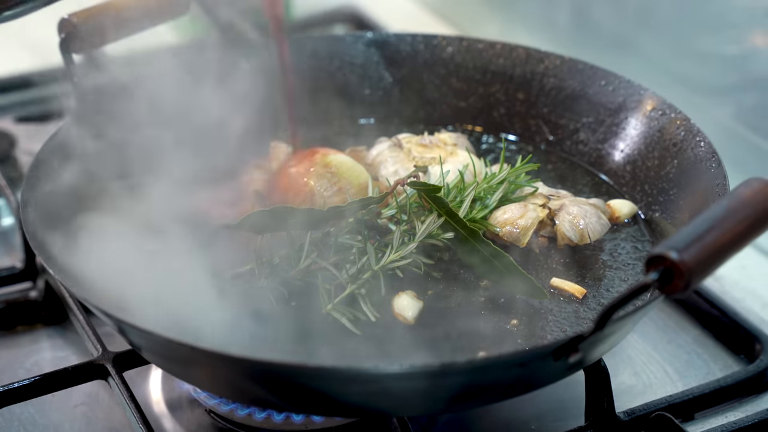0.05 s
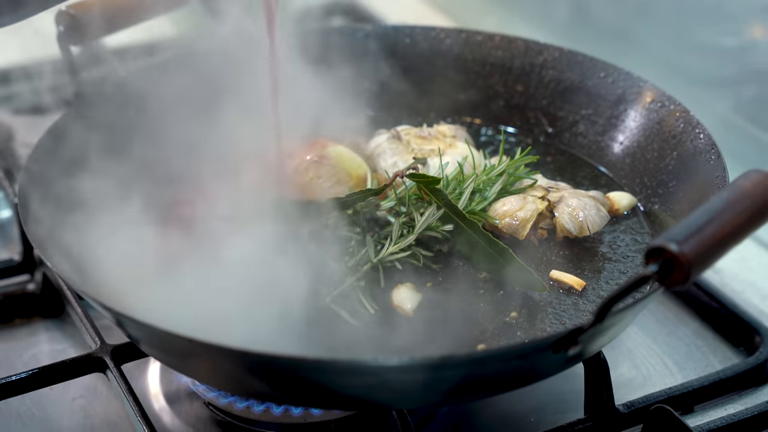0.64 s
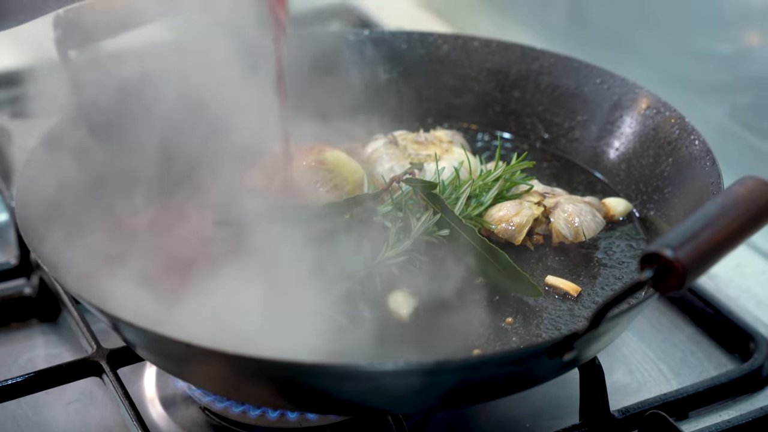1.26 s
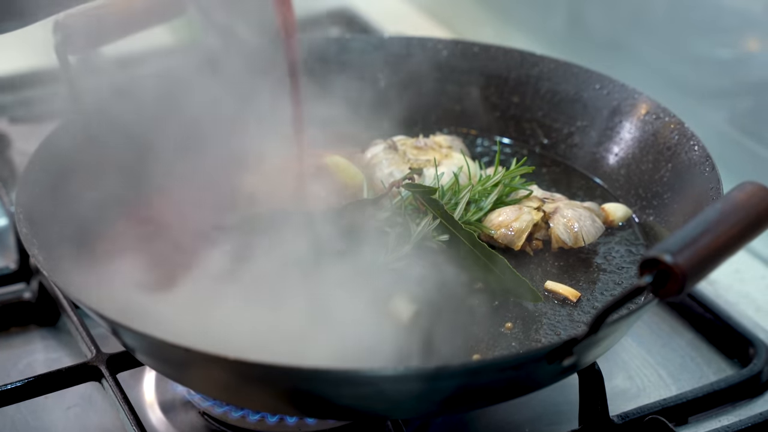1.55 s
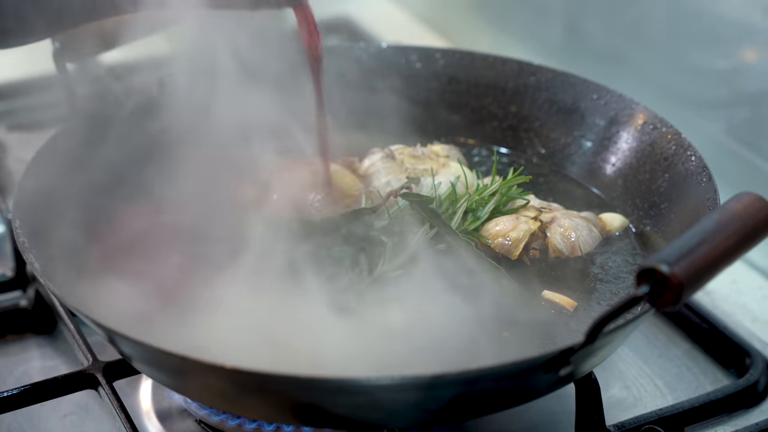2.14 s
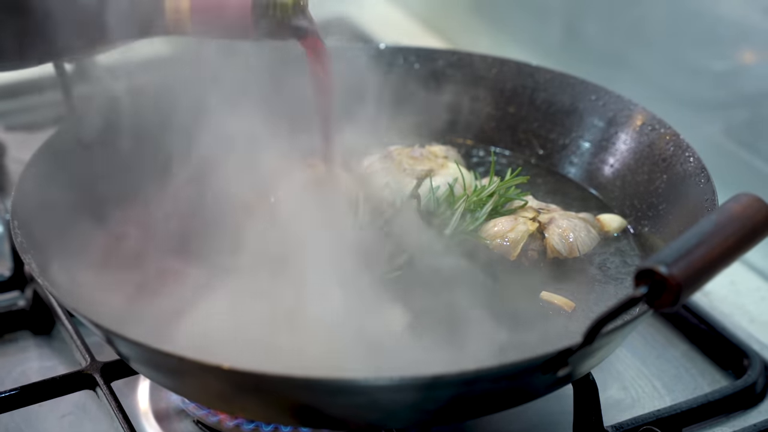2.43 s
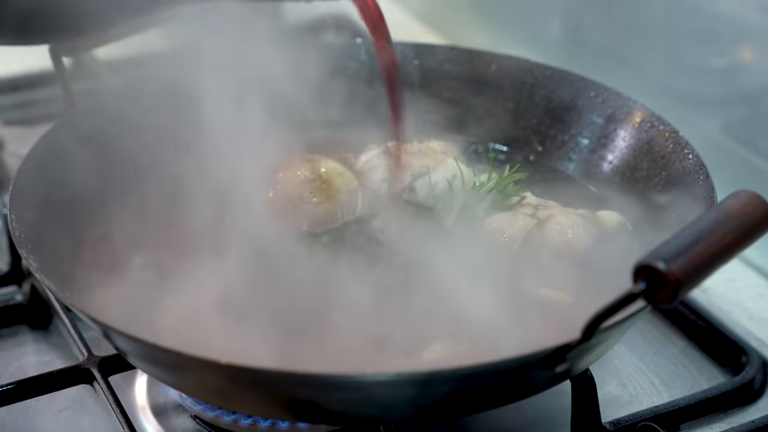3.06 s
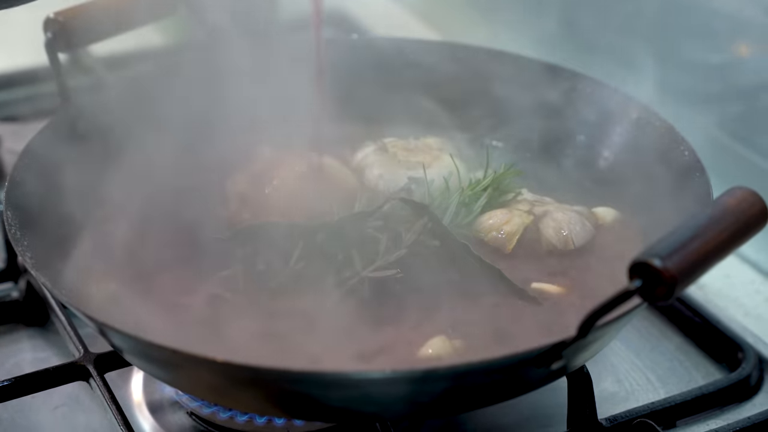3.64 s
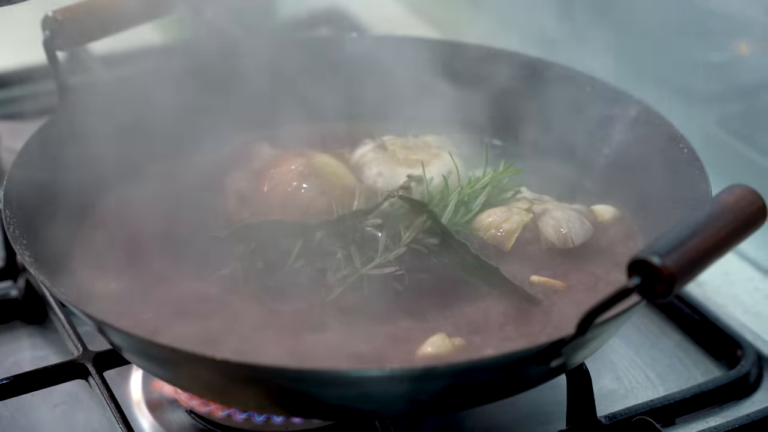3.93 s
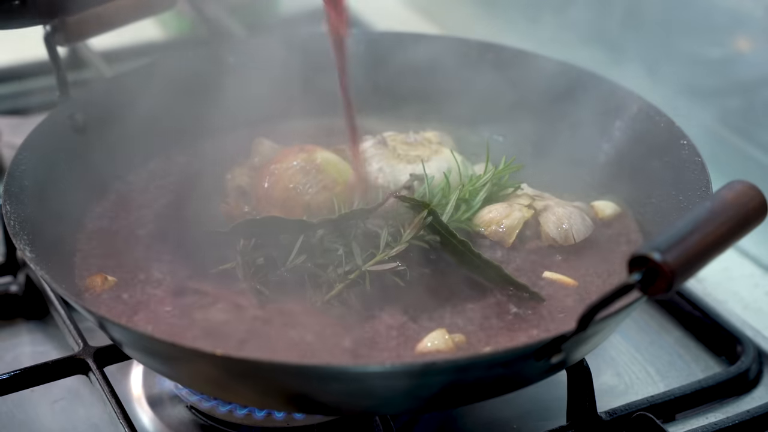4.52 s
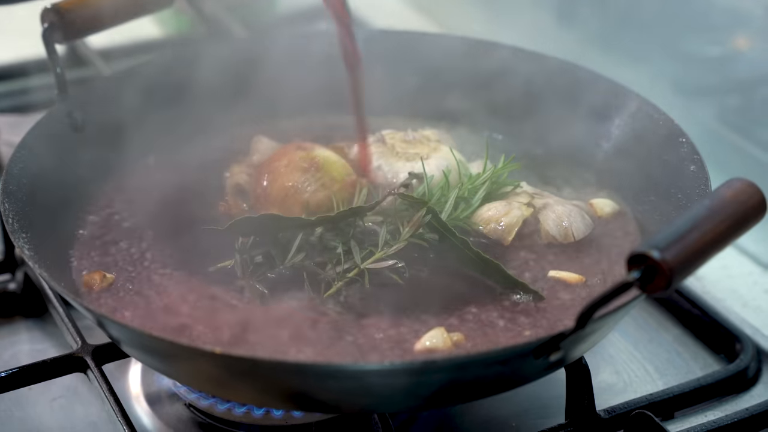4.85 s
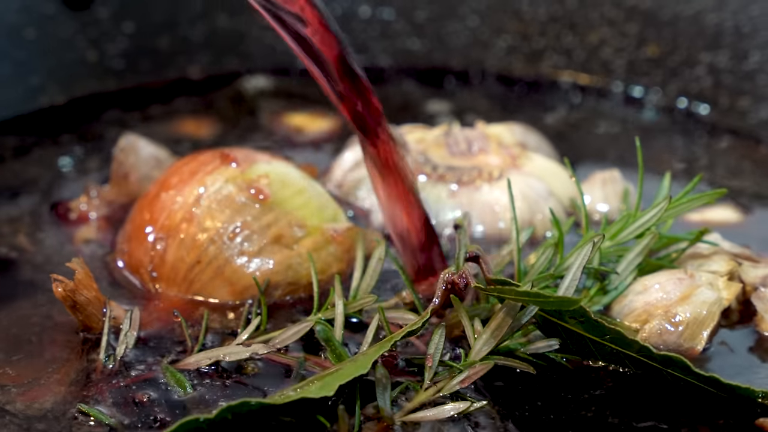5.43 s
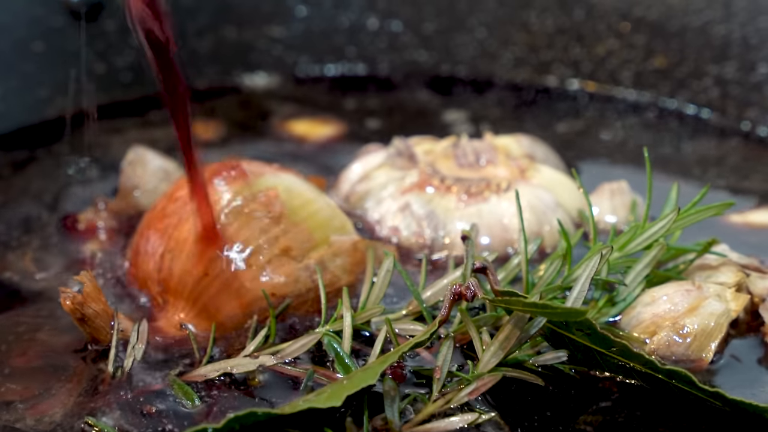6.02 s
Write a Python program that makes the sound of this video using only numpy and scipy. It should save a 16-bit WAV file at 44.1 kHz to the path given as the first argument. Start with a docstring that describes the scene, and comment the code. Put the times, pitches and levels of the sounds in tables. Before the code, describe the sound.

Wine poured into a very hot steel wok makes a dense, bright sizzle, heard close up at a kitchen gas stove. Fine bubbling seethes beneath it and grows. Both swell around the middle, then the fizz sinks and turns duller, leaving the bubbling more prominent as everything eases off. Far behind are a faint, fading steam whistle and a soft low rumble of flame and churning liquid.

```python
"""A dense bright fizz, close by: wine poured into a very hot steel wok on a gas ring.
Droplets flash to steam while bubbles seethe in the pool; the bowl colours both.
As the wine floods and cools the steel, the fizz sinks and dulls and the bubbling takes over.
Behind them, a faint fading steam whistle and the soft rumble of flame and churning liquid."""
import sys
import numpy as np
from scipy import signal
from scipy.io import wavfile

SR = 44100
rng = np.random.default_rng(int(sys.argv[2]) if len(sys.argv) > 2 else 0)


def wav_out(sig):
    """Save sig, one row per channel (or a flat mono array), as 16-bit PCM at SR to the path in sys.argv[1]."""
    wavfile.write(sys.argv[1], SR, np.round(np.clip(np.atleast_2d(sig).T, -1, 1) * 32767).astype(np.int16))


N = 276639

# Droplet burst spectrum: f/Hz, relative density/dB
FIZZ_SPECTRUM = [(420, -15.5), (540, -3.5), (750, -11.5), (1400, -8), (2400, -8.5), (3300, -4.5),
                 (4000, -4), (4800, -1), (6000, -1), (7000, -1.2), (9300, 1), (10800, 1.6), (12800, -0.1),
                 (16000, -4.5)]
# Fizz, surging as the wine reaches the last dry metal: t/s, relative level/dB
FIZZ_ENVELOPE = [(0, -32.5), (0.15, -32), (0.55, -31), (0.85, -31.5), (1.6, -30.5), (2.55, -30.5),
                 (3.05, -28), (3.5, -29.7), (4, -30), (4.4, -31.5), (5.2, -32.5), (5.8, -35), (6.27, -40)]


def fizz(t, flooded_s, trim_db=0.44, snap_share=0.078):
    """Tiny droplets burst on the steel; the hotter it is, the finer and brighter they are."""
    dulling_db = 0.68 * t + 0.56 * flooded_s
    bright_db = 1.36 - dulling_db + 0.24 * swing_db(FIZZ_ENVELOPE)
    spurts_db = 0.28 * drift(rate_hz=14)  # liquid reaches dry metal in spurts
    snaps = pops(per_s=1500, spread_db=2.5)  # larger bursts, common to all bands
    out = 0
    for k, (hz, sos) in enumerate(bands(400, 17500, count=28)):
        droplets = pops(per_s=16000, spread_db=1.77)
        bursts = np.sqrt(1 - snap_share) * droplets + np.sqrt(snap_share) * (-1) ** k * snaps
        fineness = max(hz - 7000, -2500) / 7500  # heat acts mostly on the top octave
        band_db = at_hz(FIZZ_SPECTRUM, hz) + bright_db * fineness + 0.44 * drift(rate_hz=15)
        out += from_db(band_db) * signal.sosfilt(sos, bursts)
    return from_db(in_time(FIZZ_ENVELOPE) + trim_db + spurts_db) * rms_one(out)


# Bubble spectrum: f/Hz, relative density/dB
BUBBLE_SPECTRUM = [(220, -18.5), (320, -12.5), (430, -14.5), (560, -12), (820, -6), (1000, -7), (1250, -3),
                   (1650, 1.5), (2000, -0.4), (2400, -1), (3000, -7.5), (3700, -17), (4600, -24)]
# Vigour of the boil: t/s, relative level/dB
BOIL_ENVELOPE = [(0, -40.5), (1.2, -37.0), (2.6, -36), (3.2, -34), (3.52, -32.5), (3.85, -34), (4.15, -34),
                 (5.3, -36.1), (6.27, -38.5)]


def bubbling(t, main_hz=1750, main_width_oct=0.19, trim_db=-0.1):
    """Steam bubbles collapse in the pool, each ringing some cycles at the pitch of its size."""
    tilt_db_per_oct = -0.48 + 0.2 * t  # bubbles grow finer
    focus_db = 0.1 - 0.52 * swing_db(BOIL_ENVELOPE)  # a soft boil favours one size, a hard one makes all
    surges_db = 0.33 * drift(rate_hz=20)
    out = 0
    for hz, sos in bands(200, 4800, count=24):
        rings = signal.sosfilt(sos, pops(per_s=1900, spread_db=1.74))
        octaves = np.log2(hz / main_hz)
        main_size = np.exp(-(octaves / main_width_oct) ** 2) - 0.5
        band_db = at_hz(BUBBLE_SPECTRUM, hz) + tilt_db_per_oct * octaves + focus_db * main_size
        out += rings * from_db(band_db + 0.34 * drift(rate_hz=10))
    return from_db(in_time(BOIL_ENVELOPE) + trim_db + surges_db) * rms_one(out)


# Peaks and notches of the wok: f/Hz, width/Hz, gain/dB
BOWL_RESONANCES = [(535, 44, 4), (582, 41, 2), (650, 41, -8.5), (675, 33, 4.5), (776, 36, -11),
                   (810, 43, 5), (868, 79, 2), (1030, 45, -2), (1064, 32, 4.5), (1060, 23, -1),
                   (1203, 81, 3), (1425, 39, 3.5), (1460, 81, -1.6), (1630, 52, 2.5), (1790, 31, 0),
                   (1910, 54, 3), (2380, 73, -5), (2490, 61, 2), (2630, 50, -2), (2740, 120, 1),
                   (2880, 60, -1.5), (2990, 49, 5), (3226, 70, -4), (3330, 165, 4), (4100, 140, -2),
                   (6080, 220, 2), (7630, 200, 1.5), (8100, 360, -0.7), (12550, 500, 0.7), (14350, 500, 2)]


def bowl(x):
    """Reflections inside the wok lift some pitches and cancel others."""
    for hz, width_hz, gain_db in BOWL_RESONANCES:
        lift = from_db(gain_db / 2)
        damping = np.pi * width_hz / SR
        tuning = -2 * np.cos(2 * np.pi * hz / SR)
        b = [1 + damping * lift, tuning, 1 - damping * lift]
        a = [1 + damping / lift, tuning, 1 - damping / lift]
        x = signal.lfilter(b, a, x)
    return x


def damp_ring(x, flooded_s, hz=550, width_hz=140, bare_db=0.5, loss_db_per_s=1.0):
    """The rising wine damps the low ring of the bowl."""
    b, a = signal.iirpeak(hz, hz / width_hz, fs=SR)
    gain = from_db(bare_db - loss_db_per_s * flooded_s)
    return x + (gain - 1) * signal.lfilter(b, a, x)


def whistle(t, hz=3354, width_hz=160, start_db=-54, fade_db_per_s=3):
    """Escaping steam sings in one narrow, unsteady resonance that fades as the steel cools."""
    b, a = signal.iirpeak(hz, hz / width_hz, fs=SR)
    tone = signal.lfilter(b, a, signal.lfilter(b, a, rng.standard_normal(N)))
    return from_db(start_db - fade_db_per_s * t) * rms_one(tone)


# Flame and liquid turbulence: f/Hz, relative density/dB
RUMBLE_SPECTRUM = [(20, -16), (35, -9), (55, -7), (85, 0), (130, 1), (165, -7), (210, -3.5), (300, -12),
                   (450, -25)]


def rumble(mean_db=-59.5):
    """Low turbulence of the flame and the churning liquid, swelling with fizz and boil."""
    level_db = mean_db + 0.77 * swing_db(FIZZ_ENVELOPE) + 0.7 * swing_db(BOIL_ENVELOPE)
    out = 0
    for hz, sos in bands(18, 500, count=12):
        turbulence = signal.sosfilt(sos, rng.standard_normal(N))
        out += turbulence * from_db(at_hz(RUMBLE_SPECTRUM, hz) + 0.1 * drift(rate_hz=7.1))
    return from_db(level_db) * rms_one(out)


def pops(per_s, spread_db):
    """Random clicks of either sign, many small and a few large; unit power."""
    born = rng.random(N) < per_s / SR
    sizes = from_db(spread_db * np.minimum(rng.exponential(1, N), 5))
    return rms_one(born * sizes * rng.choice([-1, 1], N))


def drift(rate_hz):
    """Smooth random wander of unit spread."""
    hop, settle = 40, 2000
    pole = np.exp(-2 * np.pi * rate_hz * hop / SR)
    noise = rng.standard_normal(N // hop + settle + 2)
    slow = signal.lfilter([1], [1, -2 * pole, pole * pole], noise)[settle:]
    return np.interp(np.arange(N) / hop, np.arange(len(slow)), rms_one(slow))


def bands(low_hz, high_hz, count):
    """Centre and band-pass of each band, evenly spaced in pitch."""
    edges = np.geomspace(low_hz, high_hz, count + 1)
    return [(np.sqrt(a * b), signal.butter(2, [a, b], "band", fs=SR, output="sos"))
            for a, b in zip(edges, edges[1:])]


def at_hz(spectrum, hz):
    """Spectrum level, interpolated in log frequency."""
    freqs_hz, levels_db = np.transpose(spectrum)
    return np.interp(np.log(hz), np.log(freqs_hz), levels_db)


def in_time(envelope):
    """Envelope level at each sample."""
    times_s, levels_db = np.transpose(envelope)
    return np.interp(np.arange(N) / SR, times_s, levels_db)


def swing_db(envelope):
    """Envelope level about its mean."""
    level_db = in_time(envelope)
    return level_db - level_db.mean()


def from_db(db):
    """Decibels to gain."""
    return 10 ** (np.asarray(db) / 20)


def rms_one(x):
    """Scale to unit power."""
    return x / np.sqrt(np.mean(x ** 2) + 1e-20)


def scene():
    """Fizz and boil in the bowl, over whistle and rumble; one microphone feeds both channels."""
    t = np.arange(N) / SR
    flooded_s = np.maximum(t - 3.0, 0)  # time since the wine covered the bottom
    wok = bowl(fizz(t, flooded_s) + bubbling(t))
    sound = damp_ring(wok, flooded_s) + whistle(t) + rumble()
    return np.stack([sound, sound])


def record(dry):
    """Steep low-pass."""
    cutoff_hz = 15750
    return signal.sosfilt(signal.ellip(14, 0.1, 85, cutoff_hz, fs=SR, output="sos"), dry)


dry = scene()
out = record(dry)
wav_out(out)
```